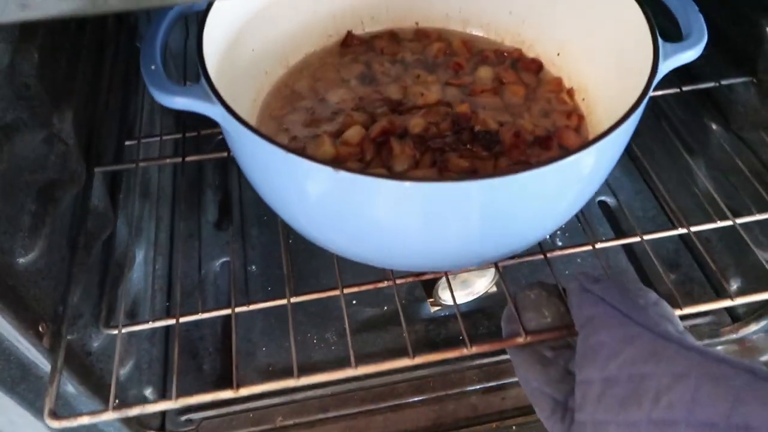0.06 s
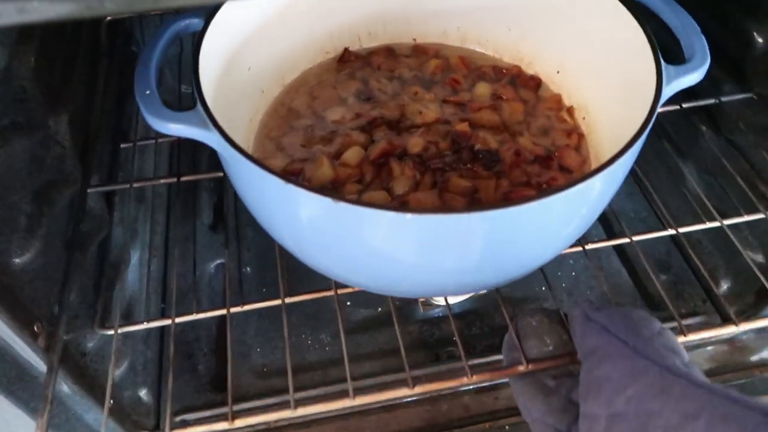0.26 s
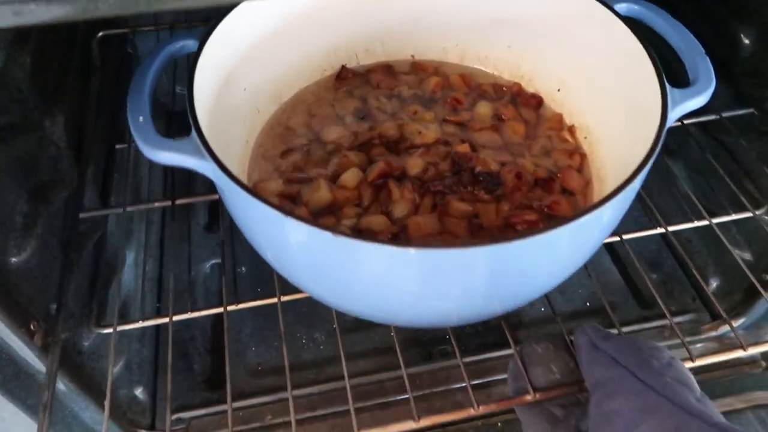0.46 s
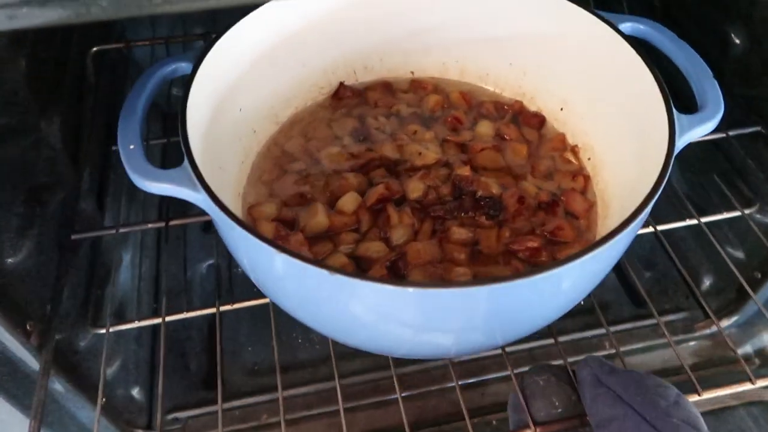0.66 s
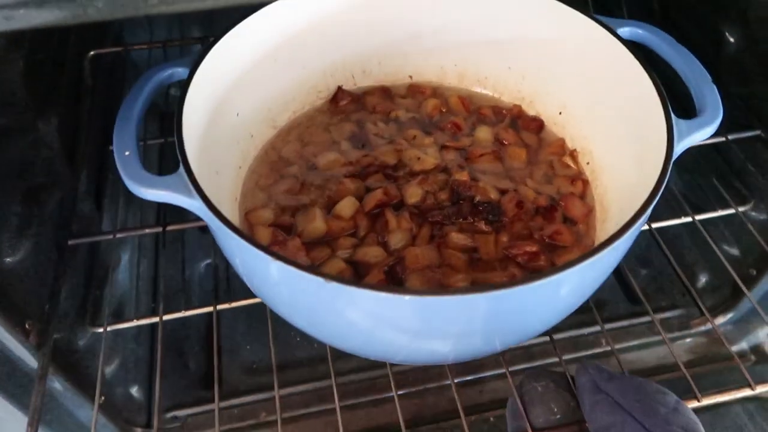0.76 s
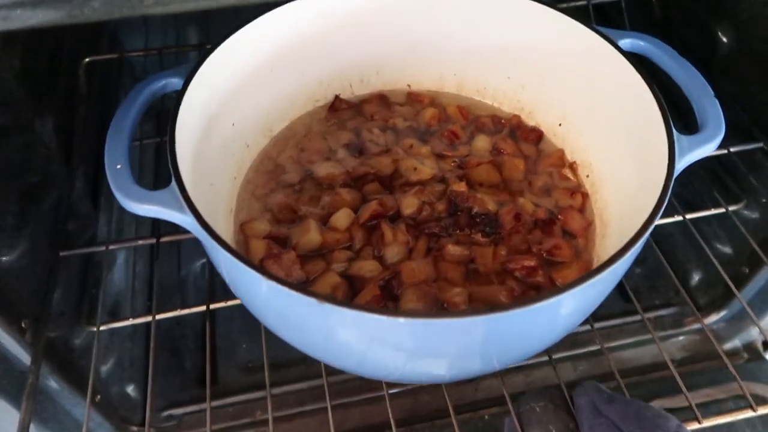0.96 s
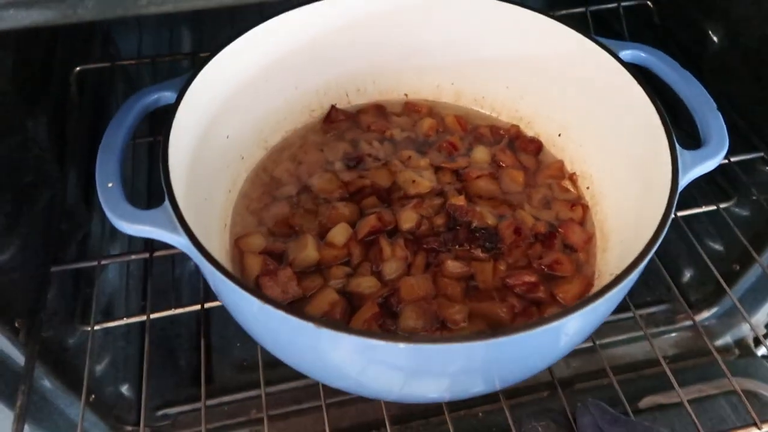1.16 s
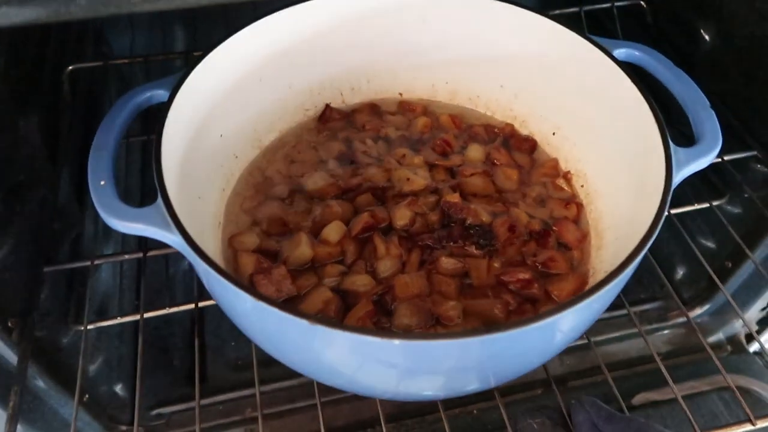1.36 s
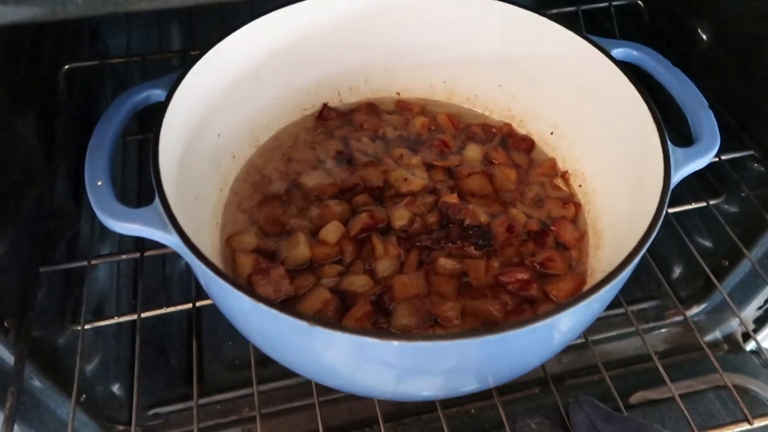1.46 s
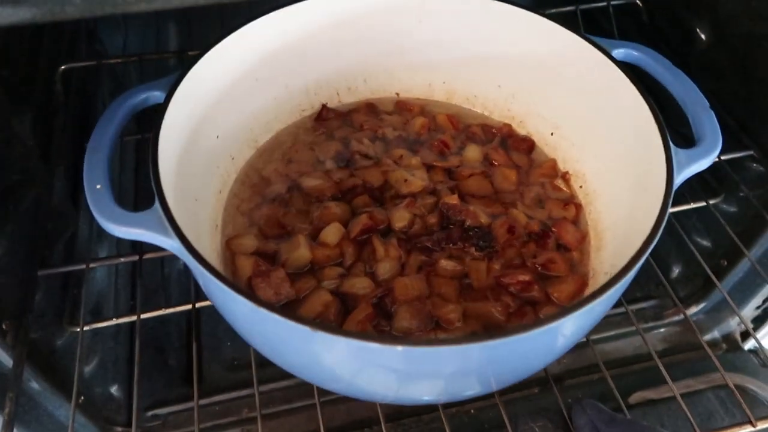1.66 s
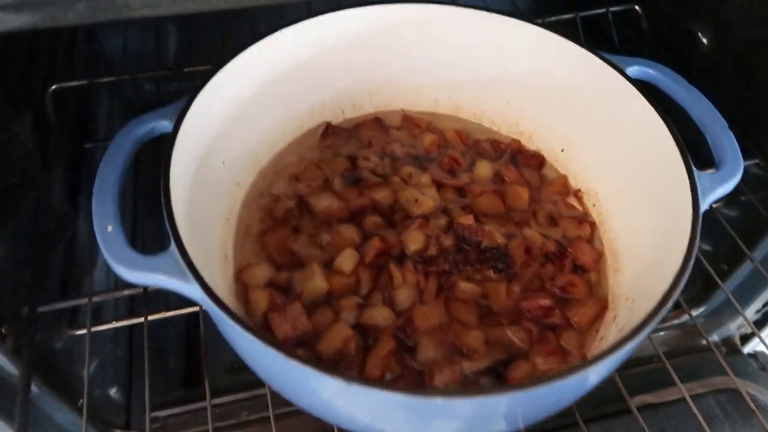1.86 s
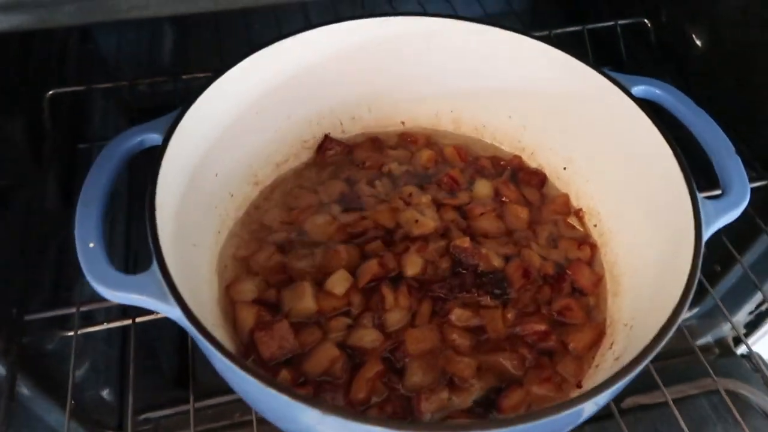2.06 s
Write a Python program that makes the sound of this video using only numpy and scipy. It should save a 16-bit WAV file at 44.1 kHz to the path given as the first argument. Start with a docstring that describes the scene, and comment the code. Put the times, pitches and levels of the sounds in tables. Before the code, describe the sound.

A wire oven rack under a heavy pot rumbles and scrapes along its rails with dull knocks, eases off to a near-silent pause, then is tugged again; close phone microphone in a quiet home kitchen.

```python
"""Oven rack dragged on its rails

A wire oven rack loaded with a heavy pot is dragged along its side rails, pauses, and is tugged again.
Dense tiny impacts of wire on rail excite box resonances as a rumble and wire modes as a bright scrape.
Damped swinging pushes make the jolts over rough spots; short harmonic tones make the stick-slip chatter.
Soft coloured noise is the air of a quiet kitchen. A close phone picks it up in stereo and cuts the extremes.
"""
import sys
import numpy as np
from scipy import signal
from scipy.fft import rfft, irfft, next_fast_len
from scipy.io import wavfile
from scipy.ndimage import uniform_filter1d

SR = 44100
rng = np.random.default_rng(int(sys.argv[2]) if len(sys.argv) > 2 else 0)


def transcribe(u):
    """Save the signal u as a 16-bit wav file named by the first command-line argument.

    u: samples, shape (n,) or (channels, n), limited to [-1, 1]; the rate is SR.
    q: integer samples, one column per channel.
    """
    v = np.clip(np.atleast_2d(u).T, -1, 1)
    q = np.round(v * 32767).astype(np.int16)
    wavfile.write(sys.argv[1], SR, q)


N = 93315
T = np.arange(N) / SR  # time [s]

# course of the drag: (time [s], rumble level [dB], scrape level [dB], wire buzz level [dB],
# rasp level [dB], treble level [dB])
DRAG_LEVELS = [(0.0, -20.5, -22.5, -37, -32, -41), (0.02, -25.5, -25.5, -38.5, -39.5, -44),
               (0.05, -23.5, -34, -35, -39, -45.5), (0.07, -24, -28.5, -35, -39, -46),
               (0.09, -26.5, -31, -34, -40.5, -48), (0.12, -25, -31, -32.5, -34, -45),
               (0.15, -25.5, -29.5, -30.5, -36, -45), (0.19, -26, -35, -34, -38.5, -49),
               (0.2, -20.5, -24, -31.5, -35.5, -45), (0.26, -24.5, -31.5, -36.5, -43.5, -46.5),
               (0.31, -24.5, -32, -38, -40.5, -41.5), (0.33, -25, -33, -42, -45.5, -46),
               (0.36, -24.5, -32.5, -35, -38.5, -41), (0.4, -24.5, -27, -33.5, -35, -39.5),
               (0.41, -21, -28.5, -33, -34, -40), (0.45, -23.5, -30.5, -38.5, -41.5, -45.5),
               (0.49, -24, -35, -38, -39.5, -47.5), (0.53, -22, -32, -39.5, -43, -44),
               (0.56, -24, -32, -35, -40, -47), (0.6, -26, -31.5, -34, -39.5, -46.5),
               (0.67, -25, -29, -32.5, -37.5, -44), (0.73, -28.5, -29.5, -38, -39, -42.5),
               (0.75, -24, -29.5, -35.5, -40, -39.5), (0.82, -29.5, -34.5, -36.5, -43.5, -44.5),
               (0.86, -26.5, -31, -35, -42.5, -42.5), (0.88, -29.5, -35.5, -38.5, -44, -45.5),
               (0.91, -28, -34, -41, -43.5, -51), (0.95, -27, -32.5, -38, -47, -52),
               (1.07, -25.5, -32.5, -41, -45, -51.5), (1.1, -26, -38, -43, -45.5, -51),
               (1.17, -27.5, -32, -36, -41.5, -47), (1.23, -30, -30.5, -39.5, -43, -49.5),
               (1.25, -18.5, -31.5, -33, -40.5, -48), (1.3, -32, -29, -34, -39, -44),
               (1.32, -24, -33, -41, -43, -52), (1.34, -33, -31, -39, -43.5, -49),
               (1.42, -33, -42.5, -49, -53.5, -66.5), (1.44, -34, -42, -49, -57, -64),
               (1.49, -40, -44, -58, -56, -67), (1.5, -33, -50, -55, -59, -63),
               (1.52, -37.5, -43, -54.5, -56.5, -61), (1.69, -43.5, -53.5, -62, -62.5, -70),
               (1.8, -43, -51.5, -57, -55, -57.5), (1.88, -33, -38, -47, -48, -52.5),
               (1.93, -28, -32, -41, -45.5, -47), (1.99, -31, -20, -32.5, -32.5, -41.5),
               (2.06, -27, -27, -37.5, -37, -48), (2.07, -27, -29, -30, -42, -47.5),
               (2.09, -24.5, -24.5, -43, -38.5, -44.5), (2.11, -22, -30, -37, -38.5, -44)]
# resonances of oven box and rack: (frequency [Hz], width [Hz], relative level [dB])
BOX_MODES = [(55, 5.2, -8), (89.7, 22.7, 2), (112.7, 9.5, -4.5), (146.4, 29.3, 4), (192.5, 56.5, 2),
             (236, 49, -21), (283.7, 20.3, -11), (362.3, 28, -4), (349, 120, -28), (470, 9.8, -14.5),
             (651, 29, -8), (844, 7.4, -45), (868, 128, -6.5), (996, 35, -33)]
# colours of the wire sound, each: (frequency [Hz], relative gain [dB])
SCRAPE_COLOUR = [(120, -26), (200, -10), (300, -9), (360, -9), (520, -9.5), (878, -9), (1100, -11.5),
                 (1500, -25.5), (2470, -35.5)]
BUZZ_COLOUR = [(1000, -17), (1300, -5), (1560, -2.5), (1850, -6.5), (2300, -29)]
RASP_COLOUR = [(1500, -35), (2000, -0.5), (2500, -2), (3200, -7.5), (4000, -12), (5590, -20.5)]
TREBLE_COLOUR = [(2350, -8.5), (4000, -3), (4500, -6.5), (6360, -4), (11800, -16), (13600, -22),
                 (14500, -37)]
# jolts over rough spots: (time [s], peak level of the push [dB], pitch [Hz], length [s])
JOLT_PUSHES = [(0.015, -10, 138, .035), (.014, -22.5, 870, 0.015), (0.025, -17.5, 198, 0.023),
               (0.058, -19.5, 161, 0.02), (0.14, -20, 164.2, 0.037), (.202, -22.5, 455.4, 0.016),
               (.243, -18, 108.5, 0.028), (0.268, -17, 157, 0.071), (.298, -16, 130.4, .03),
               (.337, -17, 123.3, 0.022), (0.402, -29, 460, 0.019), (0.422, -22, 199.6, 0.013),
               (0.436, -12.5, 136, 0.02), (0.477, -21.5, 299.3, 0.035), (0.499, -16.5, 150, 0.013),
               (0.52, -24.5, 137, .025), (.558, -15, 135, 0.016), (0.596, -15, 105, 0.028),
               (0.621, -11, 127, 0.018), (0.649, -12.5, 105, 0.016), (0.668, -13.5, 127, 0.017),
               (.7, -18.5, 160.8, 0.035), (0.716, -18, 140.3, 0.04), (.798, -23, 250, 0.041),
               (.915, -24, 92.06, 0.066), (1.044, -20, 100.7, 0.043), (1.171, -19, 149, .04),
               (1.214, -17.5, 124.5, 0.033), (1.24, -20.5, 387, 0.024), (1.255, -24, 151, 0.026),
               (1.295, -22, 138, 0.033), (1.345, -21.5, 133, 0.017), (1.514, -28, 94.6, 0.062),
               (1.885, -35.5, 885, 0.029), (1.955, -16.5, 165, 0.032), (1.966, -12, 142, 0.015),
               (1.975, -17, 450, 0.021), (1.993, -24.5, 990, 0.016), (2.005, -13, 95, 0.028),
               (2.013, -19, 340, 0.032), (2.017, -12.5, 139.1, 0.0192), (2.063, -20, 155, 0.031),
               (2.08, -29, 866, 0.065)]
# chatter of the rack on the rail: (start [s], length [s], slip rate [Hz], level [dB])
CHATTER_BURSTS = [(0.029, .11, 355, -25), (0.341, 0.079, 355, -30), (1.146, 0.131, 357, -30.5),
                  (2.063, .07, 377, -17)]
# harmonics of the chatter: (multiple of the slip rate [1], relative level [dB])
CHATTER_HARMONICS = [(1, 0), (2, -13), (3, -17.5)]
# stereo side signal: (frequency [Hz], gain [dB])
SIDE_GAIN = [(60, -57), (110, -90), (200, -45), (370, -19.5), (690, -23), (1260, -15.5), (2320, -12),
             (4260, -5.5), (7830, -2), (12500, 5), (14400, 9)]
# colour of the kitchen air: (frequency [Hz], relative gain [dB])
AIR_COLOUR = [(18, -51), (40, -15), (150, -5), (300, -10), (540, -13.5), (800, -19.5), (1150, -21),
              (2000, -39.5), (12700, -57), (14500, -72)]

GRAINS_PER_S, GRAIN_SPREAD_DB = 6000, 1.5
FLICKER_DB, FLICKER_PER_S = 2, 14.3  # of each box resonance
SURGE_DB, SURGE_PER_S = 0.72, 35  # of each colour of the wire sound
THUDS_PER_S, THUD_HZ, THUD_S, THUD_DB = 68, 133, 0.0058, -5.5  # level beside the box resonances
WIRE_SETS, WIRE_T60_S = 9, 0.055
CONTACT_DB, CONTACT_PER_S = 3.5, 30  # changing drive of each wire set
AIR_DB, AIR_SWELL_DB, AIR_SWELL_PER_S = -39.5, 0.8, 11.3
JOLT_RING_DB = -13  # of every box resonance, beside the direct push
CHATTER_RISE_S = 0.008
CHATTER_WOBBLE, CHATTER_WOBBLE_PER_S = 0.003, 90  # fraction of the slip rate
CHATTER_ROUGH_DB, CHATTER_ROUGH_PER_S = 1.2, 70.17
LOW_HZ, TOP_HZ = 44, 15000  # limits of the phone


def undb(db):
    """Decibel definition: turns a level in dB into an amplitude ratio."""
    return 10 ** (np.asarray(db) / 20)


def unit(x):
    """Root-mean-square normalisation: scales the signal to an effective value of 1."""
    return x / np.sqrt(np.mean(x ** 2))


def steady(x, seconds):
    """Running normalisation: evens out the effective level over a short time."""
    power = uniform_filter1d(x ** 2, size=int(SR * seconds))
    return x / np.sqrt(power + 1e-12)


def walk(rate):
    """Smoothed random process: levels held 1 / rate s and slewed twice, with a spread of 1."""
    hold = int(SR / rate)
    levels = np.repeat(rng.standard_normal(N // hold + 1), hold)
    slewed = uniform_filter1d(uniform_filter1d(levels, hold), hold)
    return unit(slewed[:N])


def colour(x, table):
    """Spectral filtering: weights by (frequency [Hz], gain [dB]), falling steeply outside the table."""
    hz, db = np.array(table, float).T
    size = next_fast_len(N + 8192)
    log_hz = np.log(np.maximum(np.arange(size // 2 + 1) * SR / size, 1))
    below = np.maximum(np.log(hz[0]) - log_hz, 0)
    above = np.maximum(log_hz - np.log(hz[-1]), 0)
    gain_db = np.interp(log_hz, np.log(hz), db) - 86 * (below + above)
    return irfft(rfft(x, size) * undb(gain_db), size)[..., :N]


def ring(x, hz, width):
    """Resonance: two equal peak filters in series give one steep mode, gain 1 at its centre."""
    # each filter is wider, so that the pair has about the given width
    b, a = signal.iirpeak(hz, hz / (1.5 * width), fs=SR)
    return signal.lfilter(b, a, signal.lfilter(b, a, x))


def grains():
    """Impulsive friction: dense tiny impacts of uneven size at random moments, over a faint noise."""
    hit = rng.random(N) < GRAINS_PER_S / SR
    size = rng.standard_normal(N) * undb(GRAIN_SPREAD_DB * rng.exponential(size=N))
    return unit(hit * size + 0.0016 * rng.standard_normal(N))


def thuds():
    """Damped oscillation: short round knocks of the heavy rack, about one swing each, at random."""
    t = np.arange(-SR // 20, SR // 20) / SR
    hit = (rng.random(N) < THUDS_PER_S / SR) * rng.standard_normal(N)
    knock = np.exp(-(t / THUD_S) ** 2) * np.sin(2 * np.pi * THUD_HZ * t)
    return unit(signal.fftconvolve(hit, knock, "same"))


def rumble():
    """Forced resonance: impacts drive flickering modes of the sheet-metal box, with thuds among them."""
    push = grains()
    box = np.zeros(N)
    for hz, width, db in BOX_MODES:
        flicker_db = FLICKER_DB * walk(FLICKER_PER_S)
        box += undb(db + flicker_db) * unit(ring(push, hz, width))
    return steady(unit(box) + undb(THUD_DB) * thuds(), 0.058)


def wires(push):
    """Modal density: many thin wires ring briefly as noise tails; the moving contact changes which."""
    t = np.arange(SR // 5) / SR
    tails = rng.standard_normal((WIRE_SETS, len(t))) * undb(-60 * t / WIRE_T60_S)
    out = np.zeros(N)
    for tail in tails:
        contact = undb(CONTACT_DB * walk(CONTACT_PER_S))
        out += signal.fftconvolve(push * contact, tail)[:N]
    return out


def drag():
    """Sliding friction: impacts rumble in the box and ring along the wires, following the drag."""
    t, rumble_db, *wire_db = np.array(DRAG_LEVELS).T
    out = rumble() * undb(np.interp(T, t, rumble_db))
    colours = (SCRAPE_COLOUR, BUZZ_COLOUR, RASP_COLOUR, TREBLE_COLOUR)
    for table, db in zip(colours, wire_db):
        band = steady(colour(wires(grains()), table), 0.034)
        level_db = np.interp(T, t, db) + SURGE_DB * walk(SURGE_PER_S)
        out += band * undb(level_db)
    return out


def air():
    """Broadband background noise: the soft air of the kitchen, swelling unevenly."""
    noise = unit(colour(rng.standard_normal(N), AIR_COLOUR))
    return noise * undb(AIR_DB + AIR_SWELL_DB * walk(AIR_SWELL_PER_S))


def jolts():
    """Transient excitation: short swinging pushes, heard directly and ringing on in the box."""
    push = np.zeros(N)
    turns = rng.random(len(JOLT_PUSHES))  # starting phases in turns
    for (t, db, hz, length), turn in zip(JOLT_PUSHES, turns):
        u = np.clip((T - t) / length + 0.15, 0, None)
        swell = 4 * u * np.exp(1 - 4 * u)  # peaks at 1, then dies away
        push += undb(db) * swell * np.sin(2 * np.pi * (hz * T + turn))
    box = sum(ring(push, hz, width) for hz, width, _ in BOX_MODES)
    return push + undb(JOLT_RING_DB) * box


def chatter():
    """Stick-slip oscillation: a slightly uneven slip rate sounds as a tone with harmonics."""
    out = np.zeros(N)
    for t, length, hz, db in CHATTER_BURSTS:
        slip_hz = hz * (1 + CHATTER_WOBBLE * walk(CHATTER_WOBBLE_PER_S))
        phase = 2 * np.pi * np.cumsum(slip_hz) / SR
        gate = np.clip(np.minimum(T - t, t + length - T) / CHATTER_RISE_S, 0, 1)
        tone = sum(undb(d) * np.sin(k * phase) for k, d in CHATTER_HARMONICS)
        level_db = db + CHATTER_ROUGH_DB * walk(CHATTER_ROUGH_PER_S)
        out += np.sqrt(2) * gate * tone * undb(level_db)
    return out


def scene():
    """Superposition: the sources add in the middle; separate drag and air give the stereo side."""
    mid = drag() + air() + jolts() + chatter()
    edges = signal.windows.tukey(N, 0.004)  # brief fades at both ends
    side = colour((drag() + air()) * edges, SIDE_GAIN)
    return np.array([mid + side, mid - side])


def record(dry):
    """Band limiting: the phone cuts the lowest bass and the top."""
    bass_cut = signal.butter(2, LOW_HZ, "high", fs=SR, output="sos")
    top_cut = signal.ellip(12, 0.2, 70, TOP_HZ, fs=SR, output="sos")
    return signal.sosfilt(top_cut, signal.sosfilt(bass_cut, dry))


dry = scene()
out = record(dry)
transcribe(out)
```